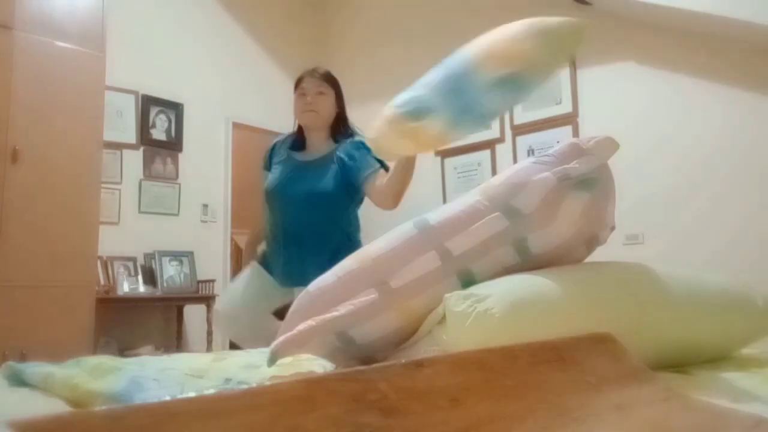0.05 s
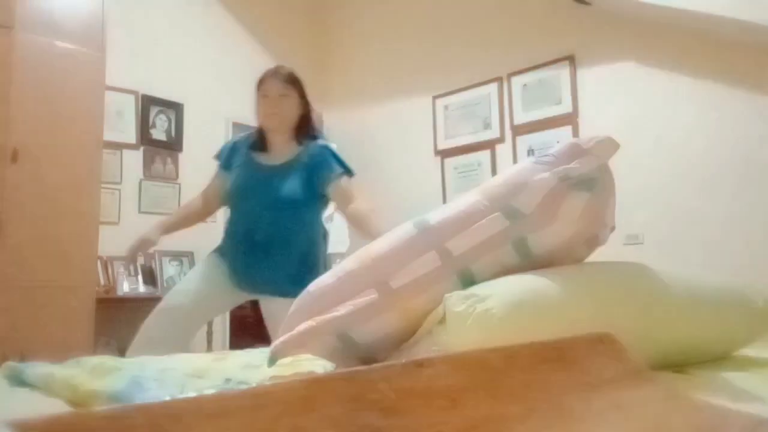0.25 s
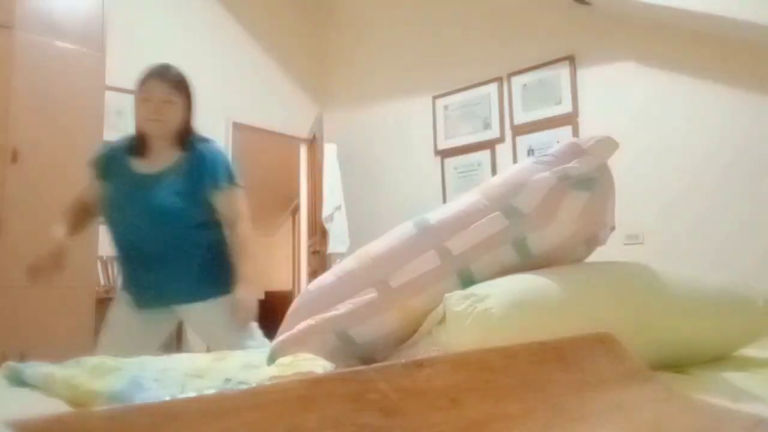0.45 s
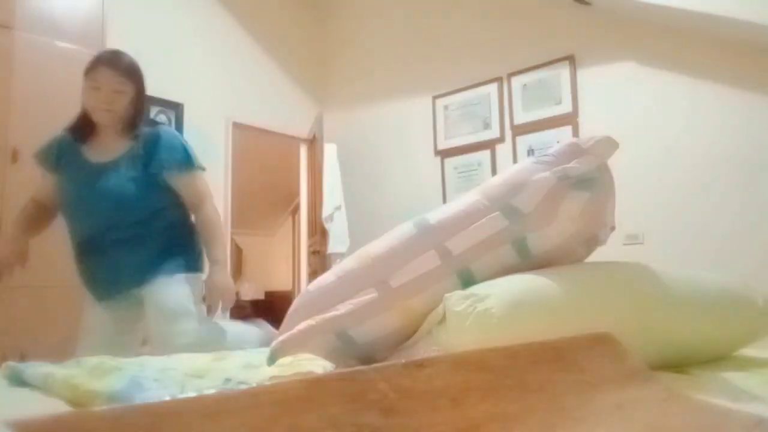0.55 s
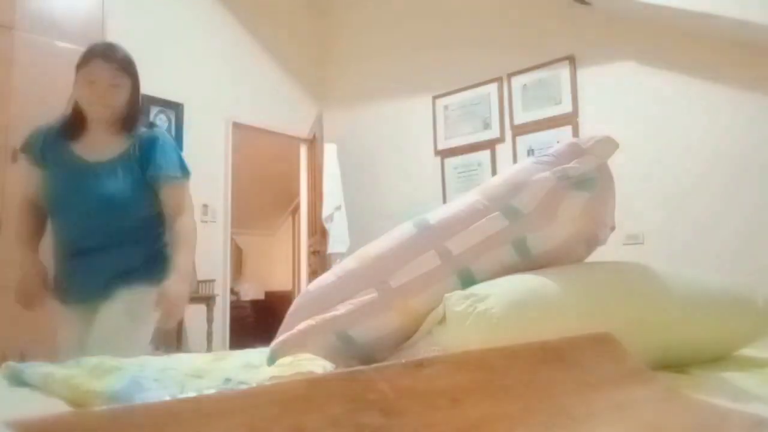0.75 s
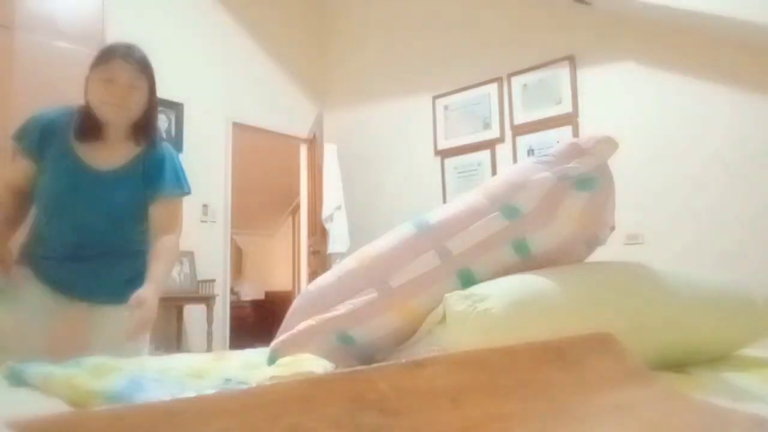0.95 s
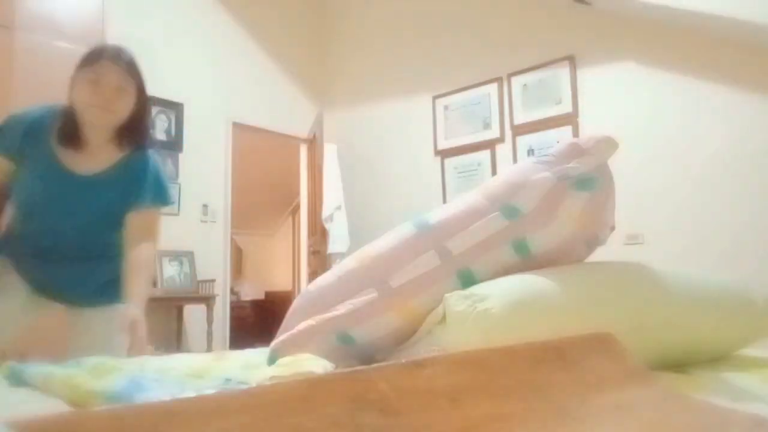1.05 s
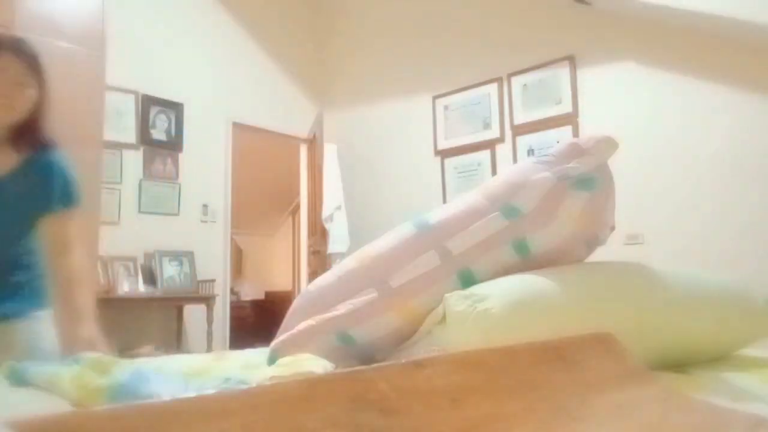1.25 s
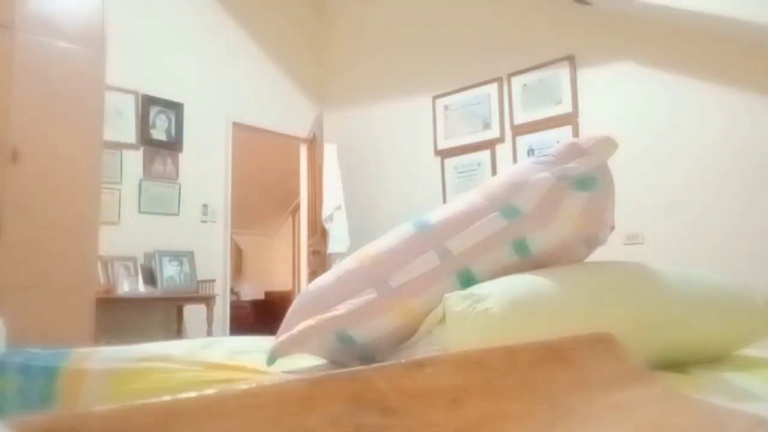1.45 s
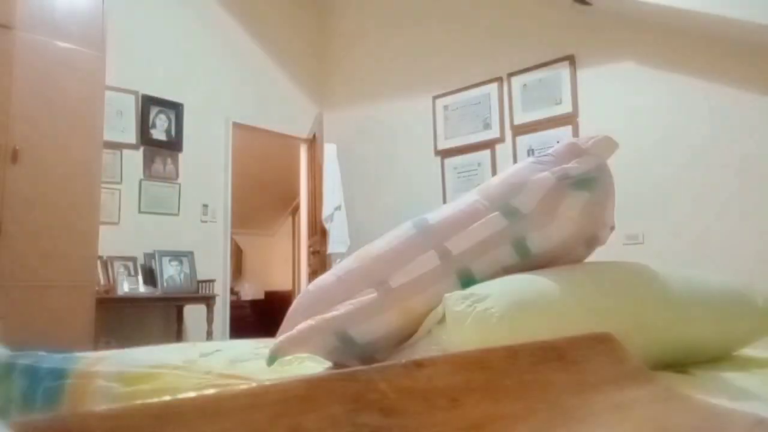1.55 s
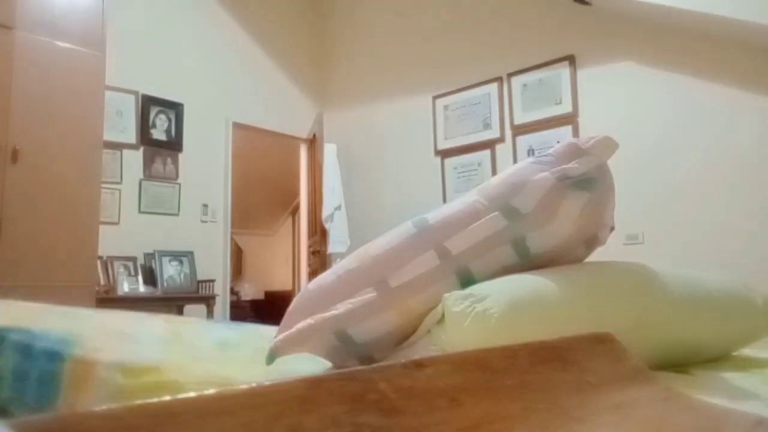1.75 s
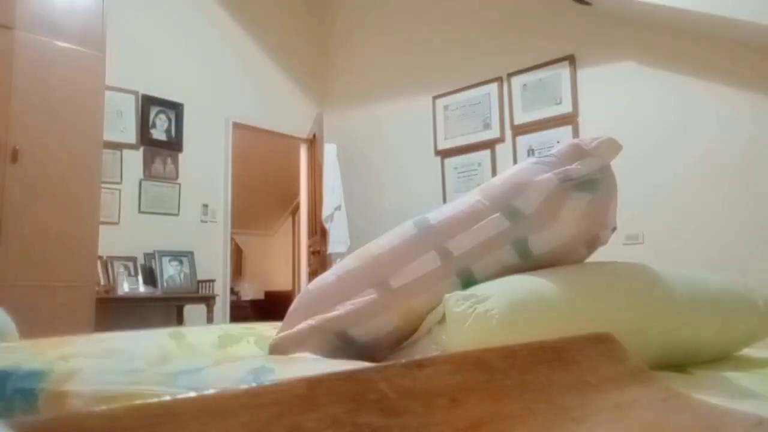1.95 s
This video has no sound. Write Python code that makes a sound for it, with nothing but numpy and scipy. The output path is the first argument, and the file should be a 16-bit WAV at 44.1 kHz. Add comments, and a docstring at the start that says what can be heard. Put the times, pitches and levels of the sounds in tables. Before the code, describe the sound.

In a small bedroom, a pillow hits the bed nearby with a padded thud and a smack of its cover. Dull footsteps, rustling fabric and low floor knocks follow, over the faint hum and whine of a fan.

```python
"""A pillow lands on a bed

A fan hums and whines faintly in a small bedroom. A thrown pillow lands close by: a soft push
of air, then a slap of its cover that rings briefly in the room. Someone walks past with
four dull footsteps and swishing clothes, while the floor knocks and rumbles."""
import sys
import numpy as np
from scipy import signal
from scipy.fft import irfft
from scipy.io import wavfile
from scipy.ndimage import uniform_filter1d

SR = 44100
rng = np.random.default_rng(int(sys.argv[2]) if len(sys.argv) > 2 else 0)


def materialize(psi):
    """Save the field psi as 16-bit PCM at rate SR to the path in sys.argv[1].

    A 1-D psi becomes a single channel; in a 2-D psi each row is a channel.
    """
    bounded = np.clip(np.atleast_2d(psi).T, -1, 1)
    quanta = np.round(bounded * 32767).astype(np.int16)
    wavfile.write(sys.argv[1], SR, quanta)


N = 88200
TIME, HZ = np.arange(N) / SR, np.fft.rfftfreq(N, 1 / SR)


def amp(db):
    """Turns decibels into a number to multiply by."""
    return 10 ** (np.asarray(db) / 20)


def unit(x):
    """Scales a signal to an average power of 1."""
    return x / np.sqrt(np.mean(x ** 2) + 1e-20)


def noise(colour, bass_db=0, treble_db=0, bass_hz=250, treble_hz=1800):
    """Noise with a colour (how strong each frequency is), its bass and treble turned up or down."""
    hz, db = np.transpose(colour)
    strength = amp(np.interp(np.log(HZ + 1), np.log(hz + 1), db))
    spectrum = strength * np.exp(2j * np.pi * rng.random(len(HZ)))
    bass = bass_db / (1 + (HZ / bass_hz) ** 2)
    treble = treble_db * HZ ** 2 / (HZ ** 2 + treble_hz ** 2)
    return irfft(spectrum * amp(bass + treble), N) / irfft(spectrum, N).std()


def swell(peak, width):
    """A smooth rise and fall in loudness."""
    return (1 + ((TIME - peak) / width) ** 2 / 3) ** -2


def hit(start, rise, fade, hold=0):
    """The loudness of a hit: it rises, holds, then drops 60 dB in `fade` seconds."""
    age = TIME - start
    onset = np.clip(age / max(rise, 1e-4), 0, 1)
    return onset * np.exp(-np.log(1000) * np.maximum(age - rise - hold, 0) / fade)


def bursts(rows, colour):
    """Short puffs of noise, like blows on something soft."""
    loudness = sum(amp(db) * hit(start, rise, fade, hold) for start, db, rise, hold, fade in rows)
    return loudness * noise(colour)


def ring(start, hz, db, fade, rise):
    """One tone that starts softly, then drops 60 dB in `fade` seconds."""
    age = np.maximum(TIME - start, 0)
    onset = np.sin(np.pi / 2 * np.minimum(age / rise, 1)) ** 2
    decay = np.exp(-np.log(1000) * np.maximum(age - rise, 0) / fade)
    return amp(db) * onset * decay * np.sin(2 * np.pi * hz * age)


def fan():
    """A fan hums and hisses, with a thin, wavering whine made of narrow bands of noise."""
    # The hum and hiss. Each row: frequency in Hz, relative level in dB.
    hum_colour = [(20, -35.5), (40, -20.5), (100, -7.5), (180, -3.5), (300, -13.5), (400, -21.5),
                  (600, -13.5), (750, -20.5), (1400, -17.5), (2400, -14), (4200, -11), (5000, -21.5),
                  (15500, -42.5)]
    # The whine. Each row: pitch in Hz, width in Hz, base level in dB, start in seconds.
    bands = [(4210, 100, -71, 0), (6600, 110, -90.5, 0.7)]
    # How the whine wavers. Each row: time in seconds, level change in dB.
    waver = [(0, -8), (.3, -3), (.6, -6), (.71, 4.5), (.85, -10), (.92, -0.5), (1.03, 1.5), (1.36, -16),
             (1.52, 2.5), (1.62, -0.5), (2, -7)]
    whine = 0
    for hz, width, db, start in bands:
        colour = [(hz - 2 * width, -40), (hz - width / 2, -5), (hz, 0),
                  (hz + width / 2, -5), (hz + 2 * width, -40)]
        fade_in = np.clip((TIME - start) / 0.041, 0, 1)
        whine += amp(db) * fade_in * noise(colour)
    return amp(-72) * noise(hum_colour) + whine * amp(np.interp(TIME, *np.transpose(waver)))


def rumble():
    """The bed and floor rumble, and the floor booms now and then."""
    # The rumble's loudness. Each row: time in seconds, level in dB.
    levels = [(0, -78.5), (.1, -66), (.16, -47.5), (.37, -48.5), (.48, -53.5), (.59, -76), (.68, -52),
              (.8, -59.5), (.91, -60), (1.0, -70.5), (1.08, -46.5), (1.22, -48.5), (1.35, -54.5),
              (1.44, -50), (1.54, -53.5), (1.66, -54), (1.8, -56.5), (1.9, -57.5), (2, -51.5)]
    # Its deep tone. Each row: frequency in Hz, relative level in dB.
    colour = [(25, -31.5), (55, -14), (85, -11), (120, -3.5), (155, -1), (220, -11.5), (310, -14),
              (420, -26.5), (900, -66.5)]
    # Floor booms. Each row: peak time in seconds, pitch in Hz, level in dB, width in seconds.
    booms = [(0.472, 298.2, -49, 0.017), (1.2, 152, -43.5, 0.046), (1.42, 150.7, -46, 0.053),
             (1.491, 166.5, -48.5, 0.04)]
    booming = sum(amp(db) * swell(peak, width) * np.sin(2 * np.pi * hz * (TIME - peak))
                  for peak, hz, db, width in booms)
    return booming + amp(np.interp(TIME, *np.transpose(levels))) * noise(colour)


def cloth():
    """Clothes and bedding swish, made grainy by tiny slips of the fabric."""
    # Each row: peak time in seconds, base level in dB, width in seconds, treble change in dB.
    swishes = [(.15, -60.5, 0.033, 7), (.32, -53, 0.032, 4), (.455, -60.5, .035, 9), (.62, -75, .02, 21),
               (.74, -66.5, 0.046, 6.5), (.87, -71, .03, 4), (.925, -73.5, 0.02, 20.5),
               (1.17, -51, .045, -4.5), (1.264, -34, 0.0272, -13), (1.324, -48, 0.035, -3),
               (1.43, -54, 0.034, -4), (1.602, -52.5, 0.053, -2.5), (1.718, -52, 0.045, 1),
               (1.871, -51.5, .045, -0.5), (1.99, -55, .045, -3)]
    # Rubbing fabric. Each row: frequency in Hz, relative level in dB.
    colour = [(150, -35), (300, -18), (460, -5.5), (670, -0.5), (1100, -1.5), (1460, -7), (2400, -7.5),
              (4200, -13.5), (5500, -25.5), (8500, -33), (11500, -50.5), (15500, -46.5)]
    crinkle_db, crinkle_seconds = 1.5, .003
    slips = unit(uniform_filter1d(rng.standard_normal(N), int(crinkle_seconds * SR)))
    grain = unit(amp(crinkle_db * slips))
    return grain * sum(amp(db) * swell(peak, width) * noise(colour, treble_db=treble)
                       for peak, db, width, treble in swishes)


def pillow():
    """The pillow lands softly, swings the mattress and sends out a spray of cloth noise."""
    # The soft landing, then the cover's smack and brighter snap.
    # Each row: start in seconds, level in dB, then rise, hold and fade in seconds.
    landing = [(.201, -27, 0.0077, 0.022, .12), (.219, -36, .005, .004, .07),
               (.242, -29, 0.0058, 0.04, 0.14)]
    smack = [(.252, -21.5, 0.0027, 0.018, 0.15)]
    snap = [(.2532, -21, 0.0018, 0.002, 0.03)]
    # The tone of each. Each row: frequency in Hz, relative level in dB.
    landing_colour = [(22, -50), (45, -25), (90, -11), (140, -3), (360, -1.5), (460, -12), (590, -4.5),
                      (760, -12), (920, -1), (1100, -19), (2500, -26), (4500, -42), (9000, -60.5),
                      (15500, -82.5)]
    smack_colour = [(25, -50.5), (60, -26.5), (115, 4.5), (300, -8), (400, -17.5), (560, -7), (700, -1.5),
                    (980, -1.5), (1300, -13), (2500, -11.5), (4000, -28.5), (6000, -35.5), (8500, -42.5),
                    (11000, -62.5), (15500, -68)]
    snap_colour = [(150, -40.5), (500, -29.5), (1500, 3.5), (2600, 3.5), (4000, -8), (7000, -21),
                   (10000, -34), (15500, -42.5)]
    # The mattress. Each row: start in seconds, pitch in Hz, level in dB, fade in seconds.
    swings = [(.194, 134.2, -22.5, .3), (.245, 202, -18.5, .14)]
    mattress = sum(ring(*swing, rise=0.0021) for swing in swings)
    thud = mattress + bursts(landing, landing_colour)
    return thud + bursts(smack, smack_colour) + bursts(snap, snap_colour)


def slap():
    """The pillow's cover slaps down: a few quick vibrations that echo off nearby surfaces."""
    # Each row: delay in seconds, level change in dB.
    echoes = [(.0069, -7.5), (.0181, -18), (.0208, -13.5), (.029, -16)]
    peak_seconds, width_seconds, level_db, pitch_hz = .2577, 0.0015, -5, 980
    sound = 0
    for delay, db in [(0, 0.0095)] + echoes:  # the direct sound comes first
        age = TIME - peak_seconds - delay
        pulse = np.exp(-(age / width_seconds) ** 2)
        sound += amp(level_db + db) * pulse * np.cos(2 * np.pi * pitch_hz * age)
    return sound


def room_ring():
    """The slap sets the small room ringing briefly at several pitches at once."""
    # Each row: pitch in Hz, level in dB, fade in seconds.
    tones = [(307, -17, .12), (482.5, -27, 0.19), (552, -32, 0.24), (657, -27.5, 0.16), (839, -23, .13),
             (982, -21.5, 0.066), (1431, -35.5, .16), (1720, -31.5, .17), (2010, -36.5, .18),
             (2306, -33, .15), (2573, -34, .15)]
    return sum(ring(.255, hz, db, fade, rise=.008) for hz, db, fade in tones)


def ticks():
    """Two faint, bright ticks of noise."""
    # Each row: start in seconds, level in dB, then rise, hold and fade in seconds.
    clicks = [(.516, -60, .0005, .001, 0.032), (.652, -51.5, 0.00037, 0.00089, .02)]
    # Their tone. Each row: frequency in Hz, relative level in dB.
    colour = [(200, -7), (700, 3), (3000, 12), (7000, -12), (15000, -19)]
    return bursts(clicks, colour)


def footsteps():
    """Feet land with a dull scuff, and the floor knocks under them."""
    # Each row: start in seconds, base level in dB, rise, hold and fade in seconds,
    # then bass and treble change in dB.
    steps = [(0.649, -51, .003, 0.025, .22, 3, 2), (1.051, -43, 0.013, 0.023, 0.22, 10, 13),
             (1.265, -23.5, 0.0072, 0.015, 0.13, -13.5, -3), (1.657, -35, 0.0058, 0.025, 0.12, 1.5, -3.5)]
    # The scuff of a sole. Each row: frequency in Hz, relative level in dB.
    colour = [(22, -53), (40, -31), (70, -15), (136, -2), (224, -4), (317, 0.5), (417, -11.5), (562, -5.5),
              (758, -9.5), (998, -11.5), (1190, -17), (1960, -17.5), (3000, -23), (5500, -44.5),
              (8500, -55), (11000, -68), (15500, -71)]
    # Floor knocks. Each row: start in seconds, pitch in Hz, level in dB, fade in seconds.
    knocks = [(1.056, 576.4, -37, 0.21), (1.075, 128, -41, 0.36), (1.076, 370, -39.5, 0.19),
              (1.273, 152, -23, 0.072), (1.275, 292, -28, .06), (1.277, 900, -24, .02),
              (1.515, 327.5, -50.5, 0.12), (1.666, 306.3, -31.5, 0.15), (1.676, 124, -34, 0.081)]
    soles = sum(amp(db) * hit(start, rise, fade, hold) * noise(colour, bass, treble)
                for start, db, rise, hold, fade, bass, treble in steps)
    return soles + sum(ring(*knock, rise=.003) for knock in knocks)


def room(sound):
    """The small room answers with a short, boomy blur of echoes."""
    # The echoes' tone. Each row: frequency in Hz, relative level in dB.
    colour = [(60, 2), (140, 4.5), (330, -1), (500, -3.5), (1000, -5), (2500, -1), (5000, 0.5), (9000, -3),
              (15000, -4.5)]
    tail = noise(colour) * hit(start=.008, rise=.01, fade=0.21)
    return signal.fftconvolve(sound, tail / np.linalg.norm(tail))[:N]


def scene():
    """Mixes the movements, their room echo and the fan into one channel."""
    movement = pillow() + slap() + room_ring() + footsteps() + rumble() + cloth() + ticks()
    return (movement + amp(-23.5) * room(movement) + fan())[None]


def record(dry):
    """Cuts away the very highest treble."""
    cutoff_hz = 15600
    low_pass = signal.firwin(511, cutoff_hz, window=("kaiser", 9), fs=SR)
    return signal.oaconvolve(dry, low_pass[None], "same")


dry = scene()
out = record(dry)
materialize(out)
```